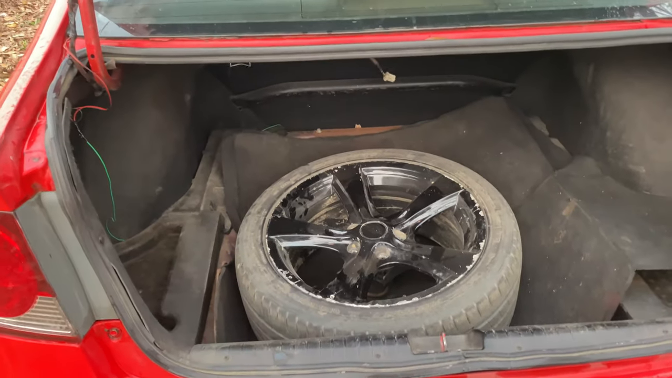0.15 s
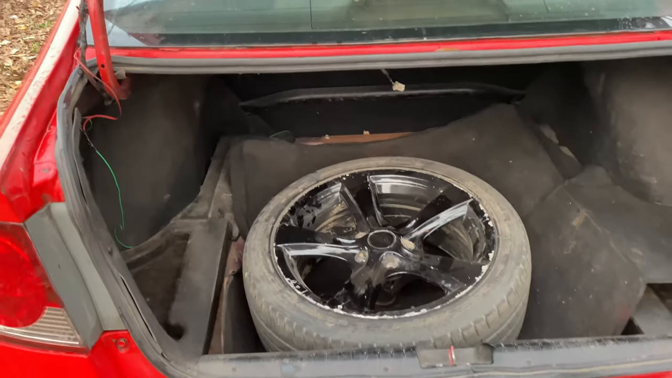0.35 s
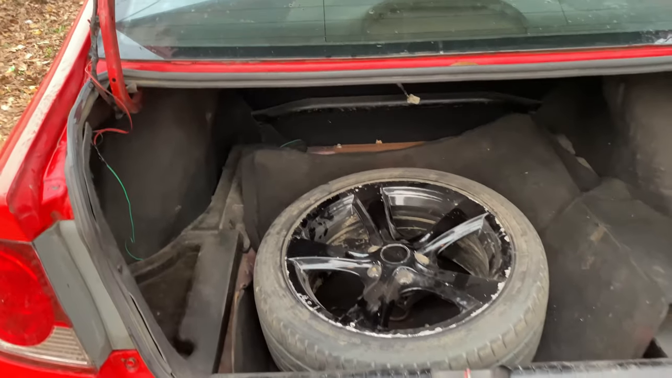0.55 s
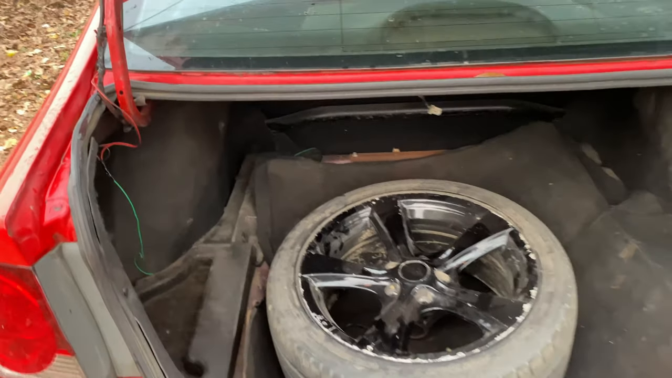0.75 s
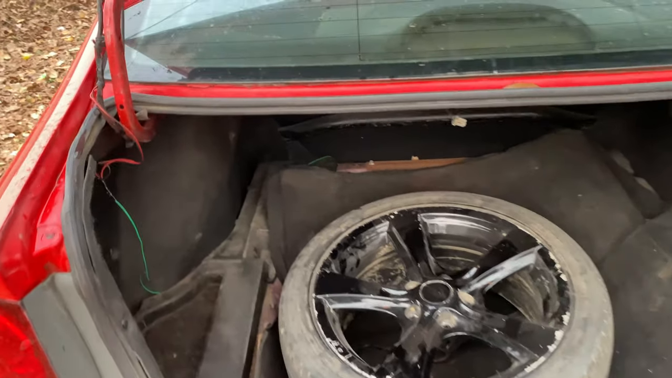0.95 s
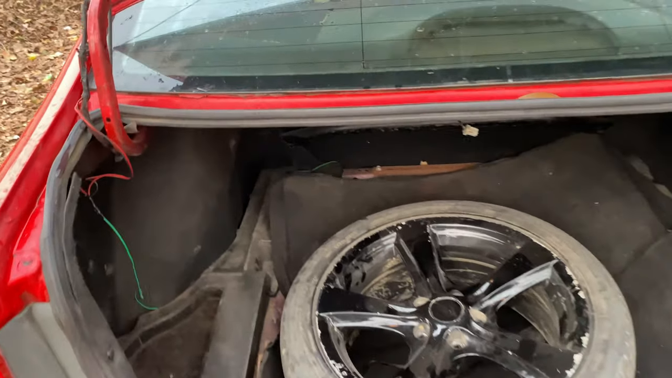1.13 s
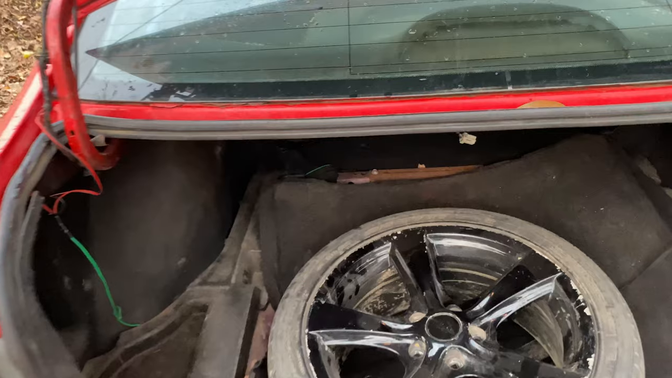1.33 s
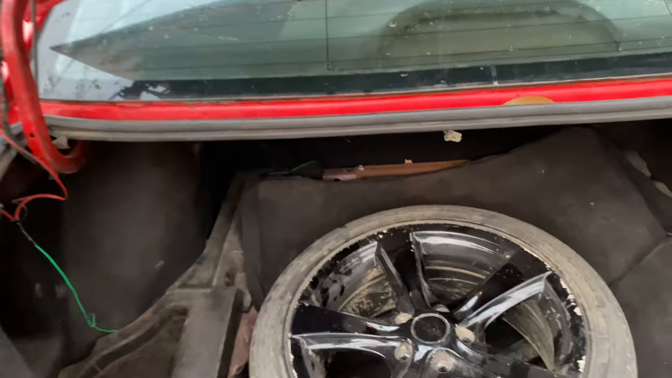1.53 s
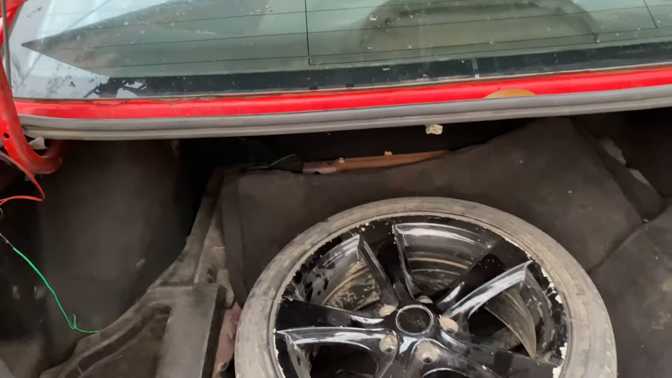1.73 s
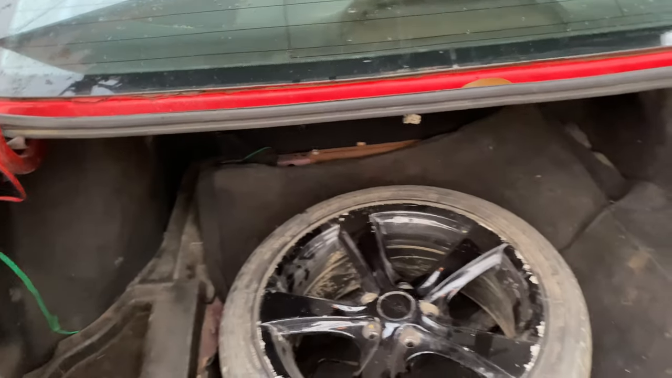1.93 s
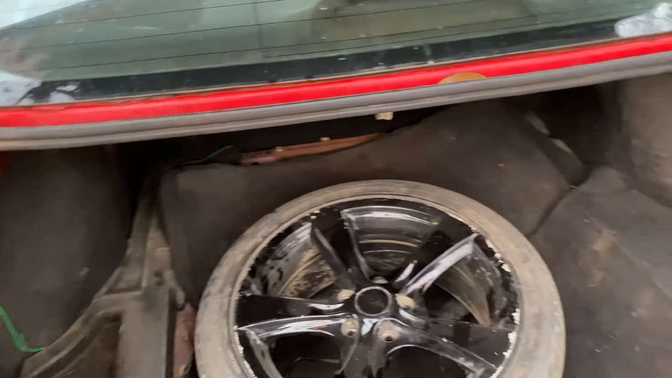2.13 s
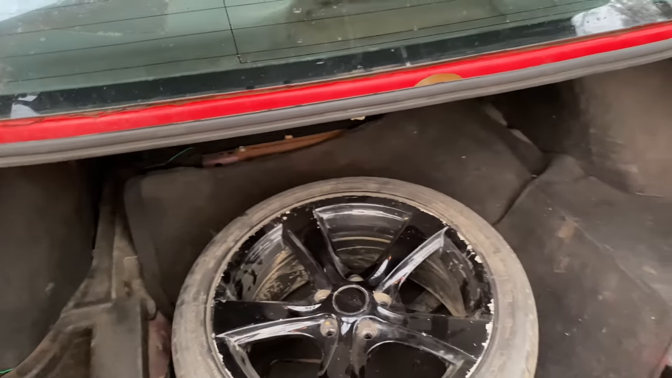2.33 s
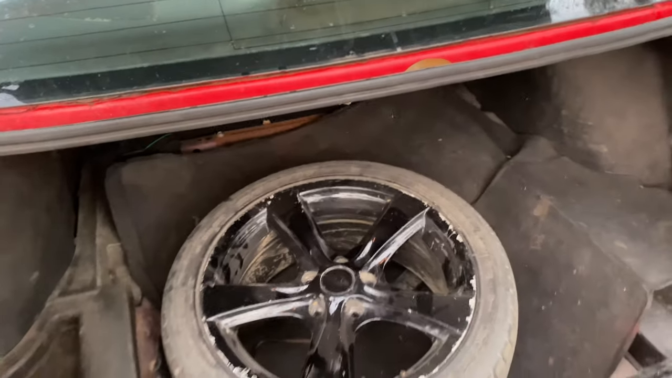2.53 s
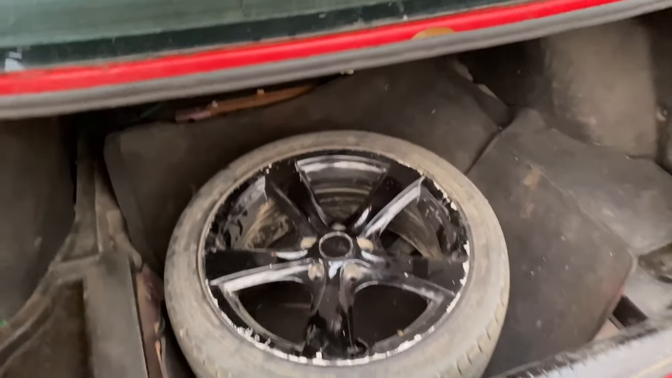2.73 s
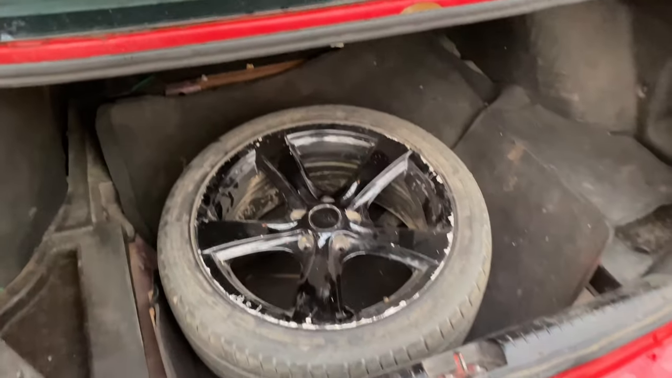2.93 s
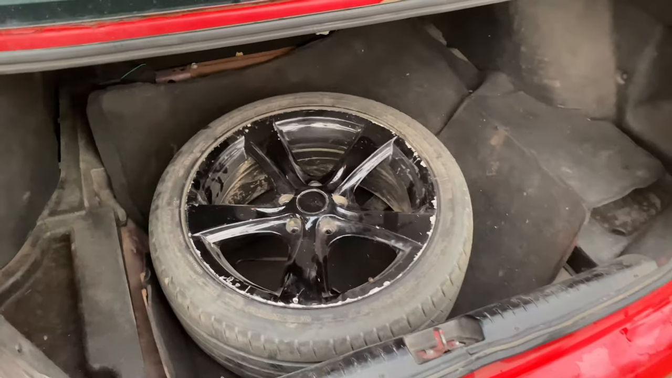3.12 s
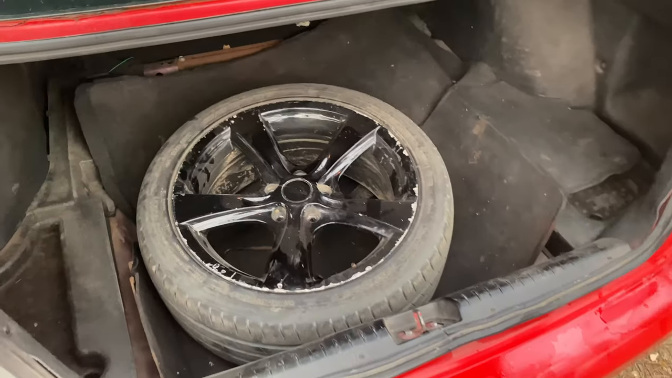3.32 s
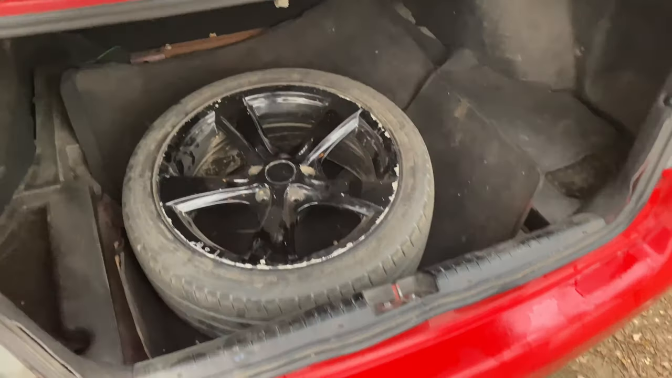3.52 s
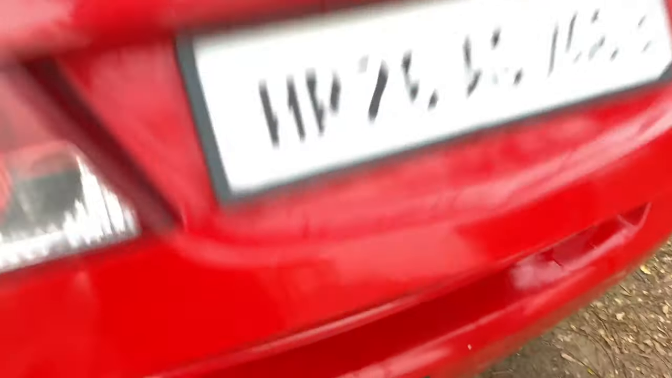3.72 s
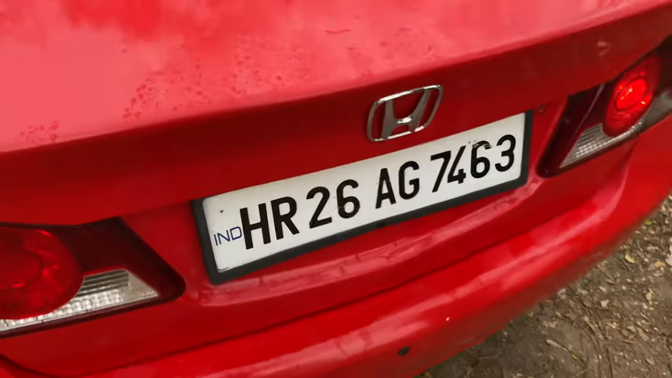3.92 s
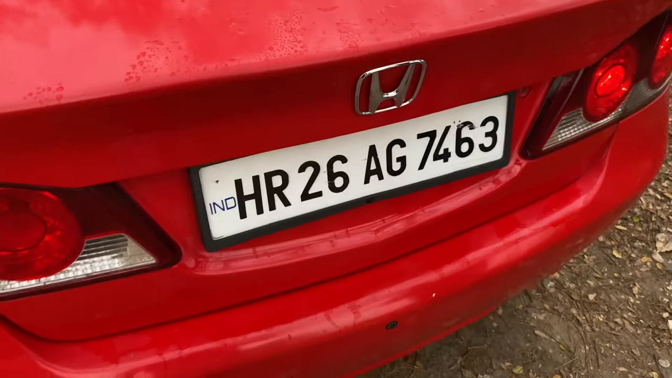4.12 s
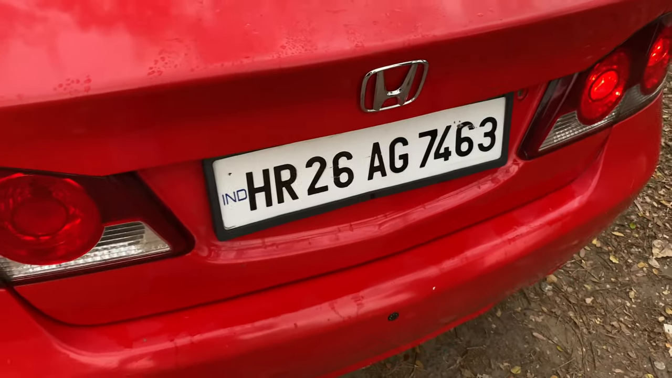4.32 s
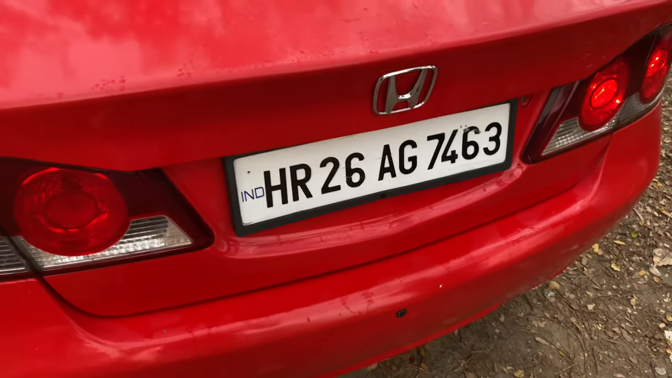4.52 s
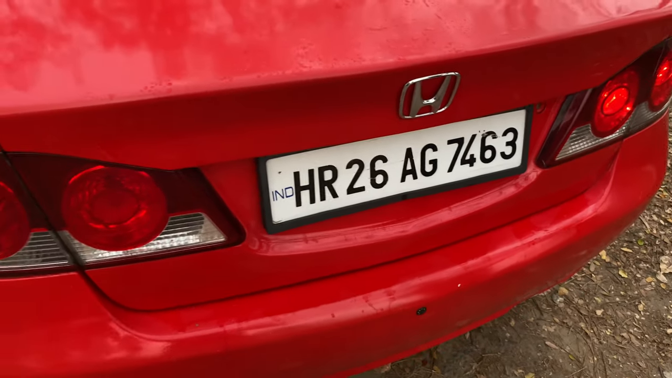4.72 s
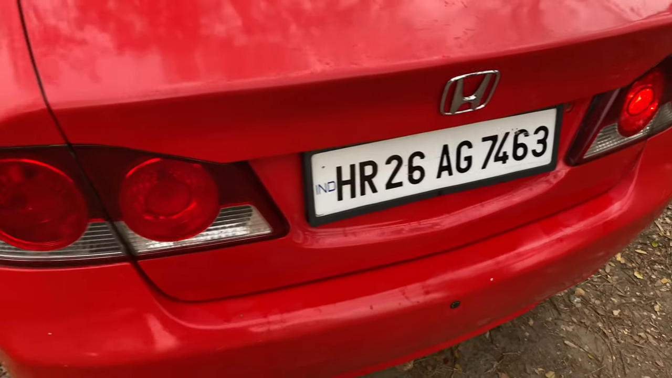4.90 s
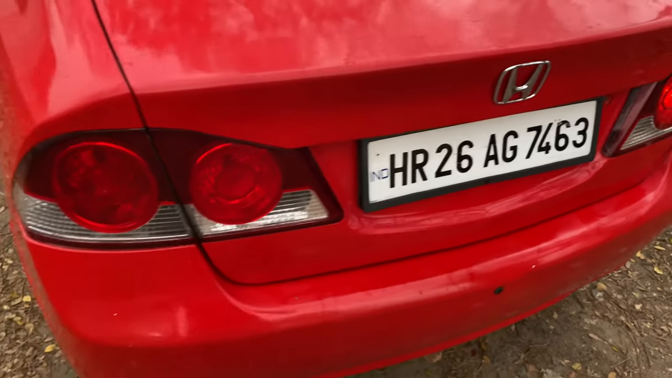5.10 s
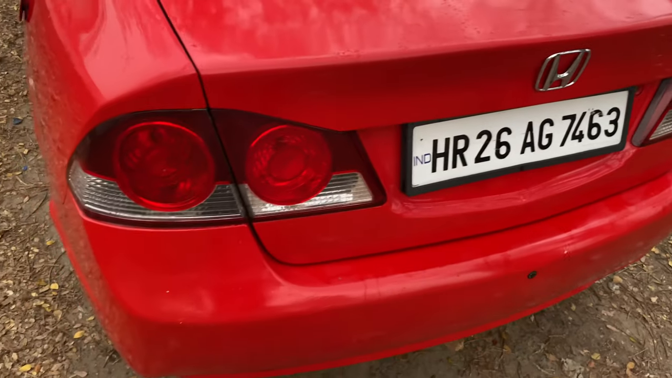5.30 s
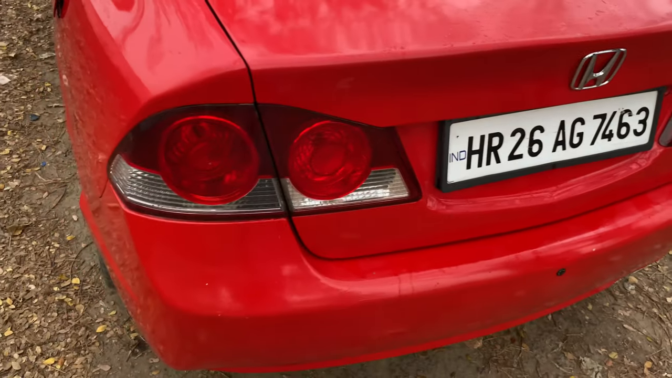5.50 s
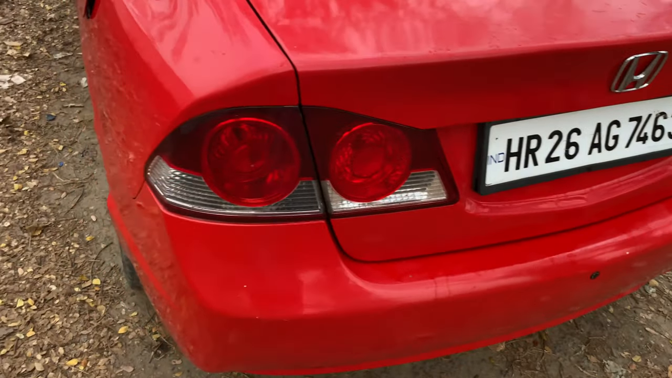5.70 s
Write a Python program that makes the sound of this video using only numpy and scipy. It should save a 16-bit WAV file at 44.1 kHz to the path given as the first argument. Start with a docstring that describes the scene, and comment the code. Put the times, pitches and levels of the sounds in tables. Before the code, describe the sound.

A car boot lid slams with a clanging thud and hollow boom outdoors, after footsteps on leafy gravel and a bird's sinking trill.

```python
"""Outdoors, traffic rumble, hush, pulsing insects (shaped noise) and an engine (harmonics) last throughout.
At first feet scuff and snap on leafy gravel (granular noise), with thumps, a knock and a bird's chirps (gliding sines).
The bird trills faster and sinking, dry knocks (damped modes) follow, and a faint whine (narrow noise) swells.
Then a car boot lid slams near a two-microphone phone: cracks, clangs, thuds, panel modes, a boom and echoes.
More scuffs and snaps come after it, with ticks of small stones and a last pair of chirps."""
import sys
import numpy as np
from scipy import signal
from scipy.fft import rfft, irfft, next_fast_len
from scipy.io import wavfile
from scipy.ndimage import uniform_filter1d, map_coordinates

SR = 44100
rng = np.random.default_rng(int(sys.argv[2]) if len(sys.argv) > 2 else 0)


def to_wav(s):
    """Save 16-bit WAV."""
    ch = np.atleast_2d(s).T  # columns
    pcm = np.round(np.clip(ch, -1, 1) * 32767)  # PCM
    wavfile.write(sys.argv[1], SR, pcm.astype(np.int16))


N = 253575  # length [samples]


def amp(db):
    """Decibel law: 20 dB is a factor of ten in amplitude."""
    return 10 ** (np.asarray(db) / 20)


def unit(x):
    """Normalisation by mean power: x at rms 1."""
    return x / np.sqrt(np.mean(x ** 2) + 1e-20)


def along(points, hz):
    """Logarithmic frequency scale: (Hz, value) points joined by straight lines on it."""
    point_hz, value = np.transpose(points)
    return np.interp(np.log(hz + 1), np.log(point_hz + 1), value)


def curves(rows):
    """Linear interpolation in time: one value per sample for each column after the time."""
    times, *columns = np.transpose(rows)
    t = np.arange(N) / SR
    return [np.interp(t, times, column) for column in columns]


def wobble(rate):
    """Slow random modulation: a smooth curve through normal draws, rate [1/s] of them."""
    knots = rng.standard_normal(int(N * rate / SR) + 4)
    return map_coordinates(knots, [np.arange(N) * rate / SR])


def filtered(x, response):
    """Linear filtering: the spectrum of x times a response of frequency."""
    size = next_fast_len(N + SR // 2)
    hz = np.fft.rfftfreq(size, 1 / SR)
    return irfft(rfft(x, size) * response(hz), size)[..., :N]


def rush(spectrum, alike, patchy_db=0):
    """Shaped noise: stereo at rms 1 with a given colour, coherence of the sides and random patches."""
    cells = signal.stft(rng.standard_normal((2, N)), nperseg=1024)[2]
    patches = uniform_filter1d(rng.standard_normal(cells.shape[1:]), 3, 0)
    patches = unit(uniform_filter1d(patches, 5, 1))
    pair = signal.istft(cells * amp(patchy_db * patches), nperseg=1024)[1][:, :N]

    def mid_and_side(hz):
        # the angle shares power between mid and side, which sets the coherence
        angle = np.arccos(np.clip(along(alike, hz), -1, 1)) / 2
        return amp(along(spectrum, hz)) * [np.cos(angle), np.sin(angle)]

    mid, side = filtered(pair, mid_and_side)
    return unit(np.array([mid + side, mid - side]))


def decay(t, db, t60, rise):
    """Exponential decay: 60 dB lost in t60 [s], after an onset of time constant rise [s]."""
    return amp(db - 60 * t / t60) * (1 - np.exp(-t / rise))


def dying(times, dbs, t60s, rise):
    """Addition of powers: one envelope for decays that start at each time."""
    power, t = np.zeros(N + SR), np.arange(SR // 2) / SR
    for start, db, t60 in zip(times, dbs, t60s):
        power[round(start * SR):][:len(t)] += decay(t, db, t60, rise) ** 2
    return np.sqrt(power[:N])


def ring(start, modes, rise):
    """Modal superposition: damped sines (Hz, dB, t60 s) struck together."""
    out, t = np.zeros(N + 2 * SR), np.arange(2 * SR) / SR
    tones = sum(decay(t, db, t60, rise) * np.sin(2 * np.pi * hz * t) for hz, db, t60 in modes)
    out[round(start * SR):][:len(t)] = tones
    return out[:N]


def echoes(x, t60):
    """Diffuse reverberation: a decaying noise tail of energy 1, different on each side."""
    t = np.arange(SR // 2) / SR
    tail = rng.standard_normal((2, len(t))) * amp(-60 * t / t60)
    return signal.fftconvolve(np.atleast_2d(x), tail / np.linalg.norm(tail[0]), axes=1)[:, :N]


def leaning(x, side, lag=((1, 0),)):
    """Diffraction round the phone: its body shades one microphone and delays one of them."""
    def level_and_delay(hz):
        gain = amp(np.outer([.5, -.5], along(side, hz)))
        return gain * np.exp(-1j * np.pi * np.outer([-1, 1], hz * along(lag, hz)))

    return filtered(x, level_and_delay)


# open air: (time [s], rumble level [dB], hush level [dB], insect level [dB])
AIR_LEVELS = [(0.0, -48, -50.5, -62), (0.7, -48, -52, -68), (1.17, -43, -52, -64.5), (1.6, -42, -51.5, -62),
              (1.98, -46, -51, -62), (2.25, -44, -50.5, -66.5), (2.7, -46.5, -52.5, -66.5),
              (3.17, -44, -50.5, -62), (3.8, -43, -48, -67), (4.1, -39.5, -52, -75),
              (4.39, -47.5, -51, -75.5), (4.85, -47, -52, -61), (5.24, -48, -53.5, -63.5),
              (5.75, -45, -51, -69.5)]
# colours of traffic, open air and insects: (frequency [Hz], relative density [dB per Hz])
RUMBLE_COLOUR = [(12, -23), (20, -37), (49, 0), (134, -12.5), (151, -14), (217, -13), (276, -20.5),
                 (500, -27.5), (650, -81), (1100, -120)]
HUSH_COLOUR = [(180, -22), (300, -1.5), (712, -7.5), (1060, -6.5), (2450, -15), (7670, -30), (9090, -41),
               (9670, -25), (10600, -43), (12000, -51), (15600, -73), (22000, -120)]
INSECT_COLOUR = [(7000, -37), (8300, -1), (9000, 5.5), (9700, -2), (10300, -50)]
# coherence of far noise at the two microphones: (frequency [Hz], left-right likeness [-1 to 1])
FAR_COHERENCE = [(60, 0.87), (130, 0.61), (290, 0.87), (640, -0.5), (1410, -0.46), (3100, 0.31),
                 (6820, -0.34), (15000, -0.75)]


def background():
    """Incoherent sources: traffic rumble, open-air hush and insects with a fast amplitude modulation."""
    rumble_db, hush_db, insects_db = curves(AIR_LEVELS)
    rumble = amp(rumble_db + 2.6 * wobble(7.7)) * rush(RUMBLE_COLOUR, FAR_COHERENCE)
    hush = amp(hush_db + 1.26 * wobble(4.8)) * rush(HUSH_COLOUR, FAR_COHERENCE, patchy_db=2.5)
    pulse_hz = 70 + 3 * wobble(2)
    pulsing = 1 + 0.1 * np.sin(2 * np.pi * np.cumsum(pulse_hz) / SR)
    insects = amp(insects_db) * pulsing * rush(INSECT_COLOUR, FAR_COHERENCE)
    return rumble + hush + insects


# narrow bands of a faint far whine: (frequency [Hz], relative density [dB per Hz])
WHINE_COLOUR = [(2400, -40), (2510, -3), (2620, -40), (2800, -40), (2918, 0), (3040, -30), (3240, -5),
                (3400, -40)]
# its rise and fall: (time [s], level [dB])
WHINE_LEVEL = [(0, -100), (2.35, -100), (2.55, -67), (3.4, -67), (3.6, -100), (5.75, -100)]


def whine():
    """Narrow-band noise: thin fuzzy bands that swell for about a second."""
    return amp(curves(WHINE_LEVEL)[0]) * rush(WHINE_COLOUR, FAR_COHERENCE)


# far engine: (time [s], firing rate [Hz], levels of multiples 1, 2 and 3 [dB])
ENGINE_HARMONICS = [(0.0, 46, -39, -42, -53), (0.12, 48.4, -53, -40.5, -52.5), (0.21, 53.2, -44, -37, -61),
                    (0.38, 49, -42, -46.5, -51), (0.61, 45.9, -60, -39.5, -56.5),
                    (0.82, 46.5, -65, -55, -64), (0.93, 44.8, -52, -41.5, -65),
                    (1.31, 46.2, -60, -38.5, -48.5), (1.5, 44.7, -51, -44.5, -59),
                    (2.04, 44, -46, -55.5, -57), (2.5, 44, -46, -50, -45.5), (2.8, 44.5, -47, -58, -62),
                    (3.6, 43, -53, -57, -65), (4.5, 47.5, -60, -51.5, -52.5), (5.0, 47.3, -44, -58, -59),
                    (5.3, 45, -41, -55, -58), (5.75, 42.8, -53, -54, -57.5)]


def engine():
    """Harmonic series: multiples of the firing rate, each wavering in level and phase on its way."""
    firing_hz, *levels = curves(ENGINE_HARMONICS)
    turns = np.cumsum(firing_hz) / SR
    drone = 0
    for multiple, db in enumerate(levels, 1):
        phase = 2 * np.pi * multiple * turns + 0.8 * wobble(4.3)
        drone = drone + amp(db + 1.94 * wobble(8.2)) * np.sin(phase)
    return drone


# trill that speeds up and sinks: (time [s], level [dB], top [Hz], start below top [fraction, capped at 0.2])
TRILL_NOTES = [(1.241, -44.5, 4810, 0.18), (1.292, -37, 4990, 0), (1.339, -34.5, 5154, 0.09),
               (1.383, -37, 5090, 0.35), (1.428, -37.5, 4900, 0.3), (1.468, -36.5, 5050, 0.28),
               (1.503, -37, 5070, 0.14), (1.54, -42, 4990, .18), (1.573, -41, 4830, .15),
               (1.608, -41.5, 4700, 0.24), (1.633, -47.5, 4550, .1), (1.66, -50, 4400, .1),
               (1.684, -55, 4270, 0.08)]
# falling chirp pairs, further off: (time [s], level of the first [dB], top of the first [Hz])
CHIRP_PAIRS = [(0.175, -59, 4890), (.426, -56.5, 5210), (1.969, -58, 4650), (2.362, -60, 4290),
               (3.591, -53.5, 4670), (5.607, -62.5, 4610)]
# shape of a chirp: (length [s], start below top [fraction], end below top [fraction])
CHIRP_SHAPE = (0.03, 0.139, 0.15)
# thin level notes: (time [s], length [s])
THIN_WHISTLES = [(1.664, .025), (1.71, .04)]


def bird():
    """Frequency modulation: whistled arches swell and break off, each led by a weaker stroke, with tree echoes."""
    # each note: time, level, top, length, start and end below top
    notes = [(s, db, hz, .018, start, .15) for s, db, hz, start in TRILL_NOTES]
    notes += [(s, -62, 6640, length, 0, 0) for s, length in THIN_WHISTLES]
    for s, db, hz in CHIRP_PAIRS:
        notes.append((s, db, hz, *CHIRP_SHAPE))
        notes.append((s + 0.036, db + 3.5, hz * 0.92, *CHIRP_SHAPE))  # lower, louder second chirp
    song = np.zeros(N)
    for s, db, top, length, start, end in notes:
        u = np.linspace(0, 1, max(int(length * SR), 9))  # position within the note
        climb = min(start, .2) * abs(1 - u / .55) ** 1.5
        fall = min(end, .2) * (abs(u - .55) / .45) ** 2
        hz = top * (1 - np.where(u < .55, climb, fall))
        swell = np.sqrt(u) * (1 - u ** 5)
        song[round(s * SR):][:len(u)] += amp(db) * swell * np.sin(2 * np.pi * np.cumsum(hz) / SR)
    leading = amp(-7) * np.roll(song, -int(.007 * SR))  # weaker stroke 7 ms ahead
    song = (song + leading) * amp(3.5 * wobble(450))
    return song + amp(-8) * echoes(song, t60=.6)


# shoes on gravel: (time of the peak [s], fizz level [dB], crunch level [dB], rise [s], fall [s])
SCUFF_EVENTS = [(0.141, -59, -52, 0.033, 0.063), (0.41, -58, -46.5, .03, 0.13),
                (1.27, -65, -62, 0.067, 0.26), (1.58, -75, -57, 0.14, 0.06),
                (1.796, -49, -40.5, 0.044, 0.074), (1.906, -66, -54, .03, .06), (2.37, -62, -58, .08, 0.27),
                (3.22, -61, -60.5, 0.17, 0.12), (3.286, -43, -46.5, 0.037, 0.097),
                (3.36, -59, -53.5, 0.14, 0.11), (3.59, -65.5, -58.5, .08, 0.47),
                (4.11, -70, -55.5, .15, 0.33), (4.279, -49.5, -50, 0.037, .05),
                (4.34, -47.5, -48, 0.05, 0.096), (4.52, -59, -63, 0.25, 0.43),
                (5.0, -54, -52.5, 0.017, 0.16), (5.16, -68, -61.5, 0.12, 0.24)]
# weight shifting between scuffs: (fizz level [dB], crunch level [dB])
SHUFFLE_LEVELS = (-79.5, -65.5)
# snapping twigs and stones: (time [s], treble level [dB], middle level [dB])
SNAP_EVENTS = [(0.401, -40.5, -43), (0.418, -45, -42), (1.1221, -55, -60), (1.2745, -56, -55),
               (1.7714, -46, -42), (1.8706, -56, -50), (1.9043, -59, -55), (3.2842, -30, -50),
               (3.2994, -55, -50), (3.4274, -39.5, -52), (3.4765, -53, -55), (4.1901, -55, -47),
               (4.2502, -45, -60), (4.258, -45, -43.5), (4.2742, -41, -55), (4.293, -42, -41),
               (4.3271, -42, -49), (4.345, -45, -49), (4.351, -47, -41), (4.454, -49.5, -49),
               (4.5022, -39, -60), (4.648, -44.5, -60), (4.6615, -52, -47), (4.706, -47, -48),
               (4.7673, -45.5, -60), (4.8711, -51, -45), (4.9767, -56, -46)]
# colours of treble fizz and middle crunch: (frequency [Hz], relative density [dB per Hz])
FIZZ_COLOUR = [(1760, -10), (3000, -14), (4030, -7), (6900, 0), (9400, -7), (11100, 2.5), (13200, -10.5),
               (14600, -7), (16000, -10)]
CRUNCH_COLOUR = [(400, -32), (900, -3), (2000, -1), (4000, -5), (7000, -10), (10000, -38)]
# coherence of near noise at the two microphones: (frequency [Hz], left-right likeness [-1 to 1])
NEAR_COHERENCE = [(60, 0.67), (130, 0.98), (300, 0.9), (900, 0.48), (1800, 0.52), (3500, 0.15), (9000, 0.1),
                  (15000, 0.17)]


def scuffs():
    """Granular friction: noise broken into grains swells and fades as shoes slide."""
    t = np.arange(N) / SR
    power = amp(np.reshape(SHUFFLE_LEVELS, (2, 1)) + 3.1 * wobble(9)) ** 2
    for s, fizz_db, crunch_db, rise, fall in SCUFF_EVENTS:
        shape_db = -20 * np.where(t < s, (s - t) / rise, (t - s) / fall)  # 20 dB over a rise or fall
        power = power + amp(np.add.outer([fizz_db, crunch_db], shape_db)) ** 2
    fizz, crunch = np.sqrt(power)
    grains = unit(amp(2.9 * wobble(500) + 0.28 * wobble(50)))
    fizz_noise = fizz * rush(FIZZ_COLOUR, NEAR_COHERENCE, patchy_db=6.5)
    return grains * (fizz_noise + crunch * rush(CRUNCH_COLOUR, NEAR_COHERENCE, patchy_db=2.5))


def snaps():
    """Impulsive fracture: placed snaps and small random ones are short bursts of noise."""
    draw = rng.random((30, 3))  # 30 small snaps
    small_db = -69.5 - 4 * np.log(1 - draw[:, 1:])  # floor plus an excess of 4 dB on average
    small = np.c_[draw[:, 0] * N / SR, small_db]
    s, treble_db, middle_db = np.r_[SNAP_EVENTS, small].T
    t60 = np.full(len(s), 0.031)
    treble = dying(s, treble_db, t60, rise=0.00058) * rush(FIZZ_COLOUR, NEAR_COHERENCE)
    return treble + dying(s, middle_db, t60, rise=0.0013) * rush(CRUNCH_COLOUR, NEAR_COHERENCE)


def struck(hits, modes, rattle_db):
    """Modal excitation: hits ring the same modes, brighter or duller, over a sharp and a longer rattle."""
    tones = 0
    for s, db, tilt in hits:
        scatter = rng.normal(0, 2, len(modes))  # [dB]
        tilted = [(hz, db + level + d + tilt * np.log2(hz / modes[1][0]), t60)
                  for (hz, level, t60), d in zip(modes, scatter)]
        tones = tones + ring(s, tilted, rise=0.0003)
    s, db, _ = np.transpose(hits)
    t60 = np.full(len(s), 0.016)
    sharp = dying(s, db + rattle_db, t60, rise=0.00034)
    longer = dying(s, db + rattle_db - 19, 4 * t60, rise=0.0026)
    return tones + (sharp + longer) * rush(CRUNCH_COLOUR, NEAR_COHERENCE, patchy_db=5)


# dry knocks near the phone: (time [s], level [dB], tilt of the ring [dB per octave])
KNOCK_HITS = [(.125, -41.5, -3), (1.8009, -24.5, -0.5), (1.8025, -31.5, -3), (1.832, -33, 1.5),
              (2.212, -30, -8)]
# modes of what is knocked: (frequency [Hz], relative level [dB], t60 [s])
KNOCK_MODES = [(480, -4.5, 0.022), (690, -2, 0.023), (1080, -3, 0.022), (1710, 0, 0.024), (2210, 1, 0.015),
               (2650, -1, .018), (3350, -12.5, 0.012), (5000, -14, .01)]
# ticks of small stones: (time [s], level [dB], tilt of the ring [dB per octave])
TICK_HITS = [(4.275, -35.5, 3), (5.003, -48, 4), (5.0204, -34.5, 10), (5.0231, -32, -4), (5.0404, -30, 2),
             (5.044, -43, 7), (5.059, -43, 1)]
# modes of the stones: (frequency [Hz], relative level [dB], t60 [s])
STONE_MODES = [(1686, -1.5, 0.017), (2970, 1, 0.017), (3290, -3, .017), (3740, -6, 0.012),
               (6340, -15, .012)]


def knocks():
    """Impact of small bodies: dry knocks and stone ticks excite short, damped modes."""
    return struck(KNOCK_HITS, KNOCK_MODES, rattle_db=-12) + struck(TICK_HITS, STONE_MODES, rattle_db=-12)


# soft thumps of feet and of the moving lid: (time [s], level [dB], t60 [s], ring pitch [Hz])
THUMP_HITS = [(0.399, -34, 0.11, 372), (0.419, -27, 0.17, 74.6), (0.443, -31, 0.16, 161.4),
              (0.471, -30, 0.13, 69), (0.492, -33, 0.12, 116), (1.803, -36, 0.18, 65.5),
              (3.13, -39, 0.062, 350), (3.633, -34, 0.055, 328), (3.675, -39.5, 0.13, 194),
              (3.713, -41.5, 0.099, 252), (3.752, -30.5, 0.056, 250), (3.901, -26.5, 0.56, 52)]
# colour of the dull push: (frequency [Hz], relative density [dB per Hz])
THUMP_COLOUR = [(24, -33), (40, -2.5), (161, -3), (201, -17.5), (275, -11), (330, -18.5), (900, -32),
                (1170, -64), (1980, -120)]


def thumps():
    """Heavily damped resonance: a dull push of noise with two low pitches that die fast."""
    tones = 0
    for s, db, t60, hz in THUMP_HITS:
        tones = tones + ring(s, [(hz, db, t60), (1.7 * hz, db - 7, t60)], rise=0.0042)
    s, db, t60, _ = np.transpose(THUMP_HITS)
    return tones + dying(s, db, t60, rise=0.002) * rush(THUMP_COLOUR, NEAR_COHERENCE)


# lid and body panels: (frequency [Hz], relative level [dB], t60 before the seal's limit [s])
PANEL_MODES = [(118.6, 1, .3), (183.5, -2, 0.24), (259.4, -0.5, 0.19), (307, -13, .12), (356, 3, 0.094),
               (405, -2, 0.17), (450, -28, 0.096), (525, -7, 0.12), (553, -13, 0.067), (628, -13, 0.07),
               (770, -12, 0.024), (906, -5.5, 0.14), (980, -31, 0.12), (1070, -37, .1), (1196, -28, 0.13),
               (1407, -19, 0.094), (1457, -7, 0.064), (1562, -11.5, 0.14), (2230, -15, 0.091)]


def panels(s, clang_db, thud_db):
    """Plate modes: every contact rings the panels anew, with scattered levels."""
    ringing = 0
    for start, high_db, low_db in zip(s, clang_db - 4, thud_db - 4):
        scatter = rng.normal(0, 1.5, len(PANEL_MODES))  # [dB]
        modes = []
        for (hz, level, t60), d in zip(PANEL_MODES, scatter):
            # low modes follow the thud, high modes the clang; the rubber seal lets nothing ring long
            blow_db, longest = (low_db, .2) if hz < 700 else (high_db, .13)
            modes.append((hz, level + d + blow_db, min(t60, longest)))
        ringing = ringing + ring(start, modes, rise=0.00072)
    return ringing


# boot air, then the body swaying after the rebound: (time [s], frequency [Hz], level [dB], t60 [s], rise [s])
BOOM_MODES = [(3.832, 68.1, 4, 0.18, 0.01), (3.831, 88, -12, 0.13, 0.008), (3.899, 58, -23, 0.25, 0.0092),
              (3.999, 62.6, -23.5, 1, 0.091)]


def boom():
    """Cavity resonance: closing squeezes the air in the boot, then the body sways on."""
    return -sum(ring(s, [(hz, db, t60)], rise) for s, hz, db, t60, rise in BOOM_MODES)


# contacts of lid, latch and trim: (time [s], crack [dB], clang [dB], thud [dB], t60 of the clang [s])
LID_CONTACTS = [(3.7512, -46.5, -42.5, -38.5, 0.099), (3.777, -42, -54, -48, .055),
                (3.8138, -33, -32, -34, 0.15), (3.8242, -13, -7, -15.5, .073), (3.8275, -36, -23, -13, .1),
                (3.8347, -16, -18, -17.5, .12), (3.8507, -21.5, -19.5, -18.5, 0.067),
                (3.8646, -28.5, -22.5, -17, 0.099), (3.8805, -22.5, -15, -22, 0.087),
                (3.89, -29.5, -34, -33, .08), (3.9111, -33, -32, -30, 0.081),
                (3.9381, -36.5, -31.5, -44, 0.067), (4.0057, -44, -31.5, -43.5, 0.054),
                (4.0372, -50, -40, -50, 0.096), (4.0537, -46, -41.5, -52, 0.11),
                (4.0744, -49, -51, -42.5, 0.11)]
# colours of the three parts of a contact: (frequency [Hz], relative density [dB per Hz])
CRACK_COLOUR = [(1470, -57), (2500, -7), (4480, -3), (5350, -4.5), (6300, -6), (9080, -14), (11300, -8),
                (13200, -21), (15000, -26), (16000, -14)]
CLANG_COLOUR = [(350, -17), (600, -6.5), (799, -15), (892, -1), (1000, -3.5), (1890, -9), (4500, -22),
                (5850, -49), (9900, -120)]
THUD_COLOUR = [(53, -22), (90, -10), (160, -9.5), (250, -6), (440, -6.5), (620, -25.5), (900, -30),
               (1400, -60)]


def lid():
    """Multiple impact: contacts crack, clang, thud and ring; trees and walls reflect them; the boot booms."""
    s, crack_db, clang_db, thud_db, t60 = np.transpose(LID_CONTACTS)
    rattle = unit(amp(1.5 * wobble(540)))
    crack = dying(s, crack_db, .6 * t60, rise=0.00061) * rattle * rush(CRACK_COLOUR, NEAR_COHERENCE)
    clang = dying(s, clang_db, t60, rise=0.0022) * rush(CLANG_COLOUR, NEAR_COHERENCE)
    thud = dying(s, thud_db, 1.9 * t60, rise=.003) * rush(THUD_COLOUR, NEAR_COHERENCE)
    clash = crack + clang + thud + panels(s, clang_db, thud_db)
    return clash + amp(-26) * echoes(clash, t60=0.79) + boom()


# level difference of far and of near sound: (frequency [Hz], left over right [dB])
FAR_BALANCE = [(60, 0), (110, 5), (200, 1.5), (380, 2.5), (700, 5.5), (1290, 3.5), (2380, 0.5), (4400, 2),
               (8120, -4.5), (15000, -9)]
NEAR_BALANCE = [(60, 2), (110, 4.5), (200, 2.5), (380, 2.5), (700, 5), (1290, 7), (2380, 7), (4400, 0),
                (8120, 1.5), (15000, -1)]
# near sound creeping round the phone: (frequency [Hz], delay of the right side [s])
NEAR_DELAY = [(1800, .0002), (5000, 0), (7000, -.0002)]


def scene():
    """Interaural-like cues: far and near sounds reach the two microphones differently."""
    far = background() + whine() + engine() + bird()
    near = scuffs() + snaps() + knocks() + thumps() + lid()
    return leaning(far, FAR_BALANCE) + leaning(near, NEAR_BALANCE, NEAR_DELAY)


def record(dry):
    """Band limiting and saturation: deep bass is lost, peaks are squeezed, nothing stays above 16 kHz."""
    def bass_loss(hz):
        p = 1j * hz / 42  # corner at 42 Hz
        return p ** 2 / (1 + 1.3 * p + p ** 2)

    thin = filtered(dry, bass_loss)
    squeezed = thin / (1 + np.abs(thin) ** 6) ** (1 / 6)
    return filtered(squeezed, lambda hz: hz < 16000)


dry = scene()
out = record(dry)
to_wav(out)
```